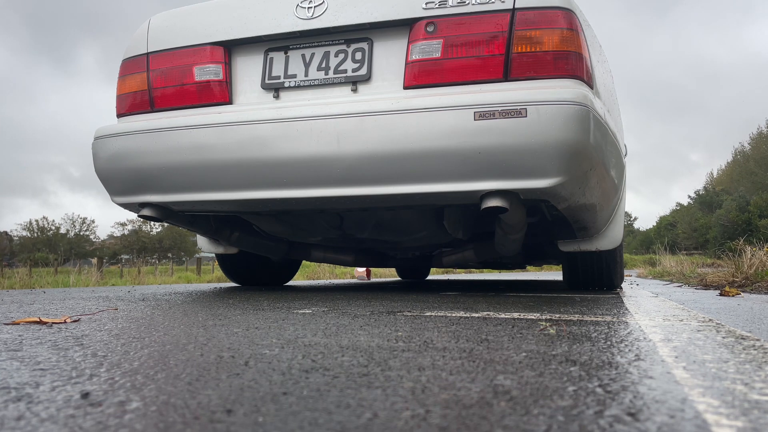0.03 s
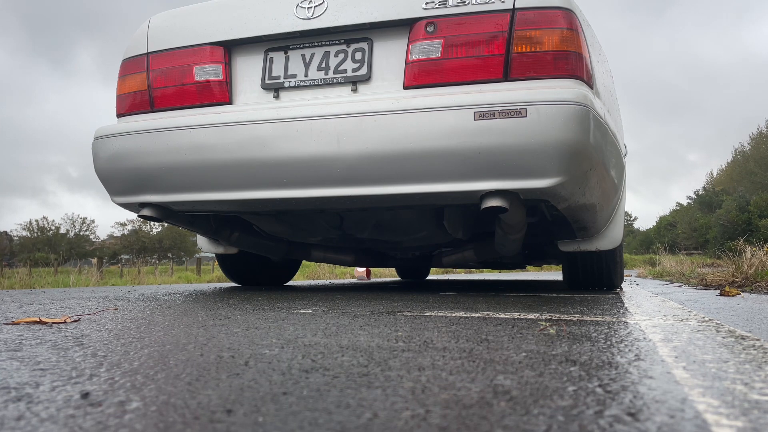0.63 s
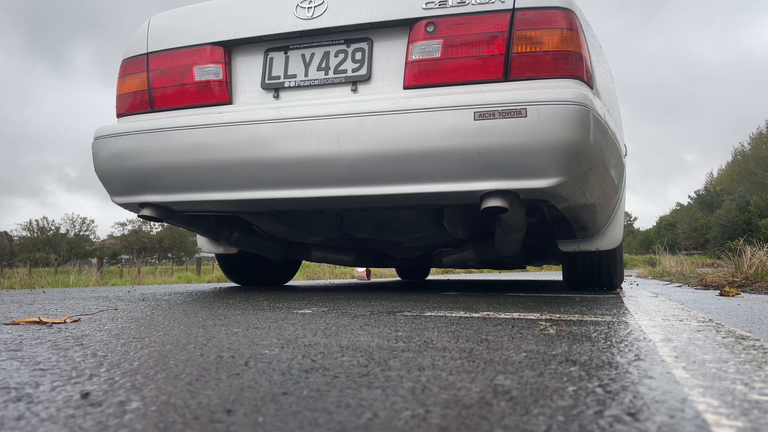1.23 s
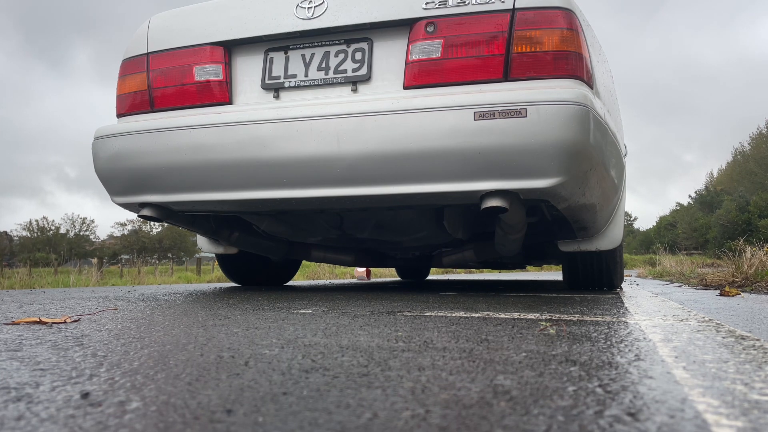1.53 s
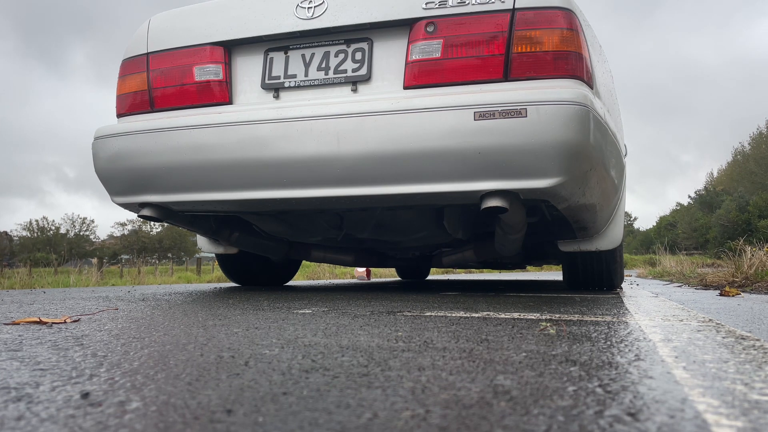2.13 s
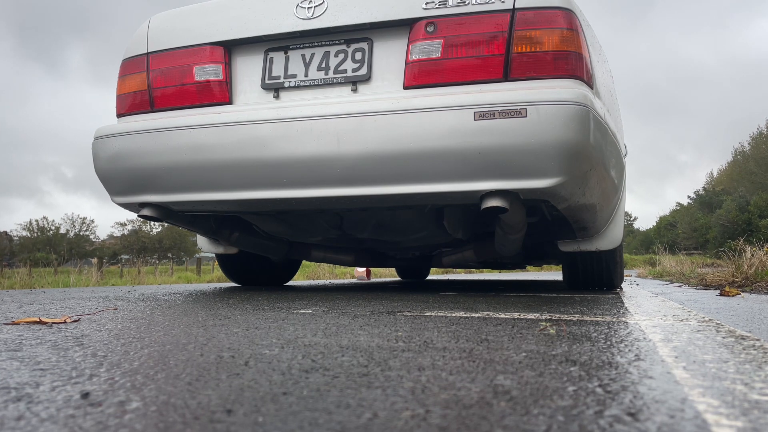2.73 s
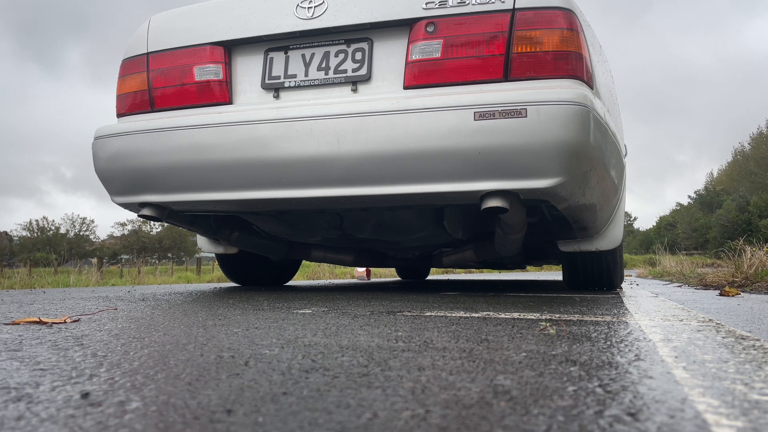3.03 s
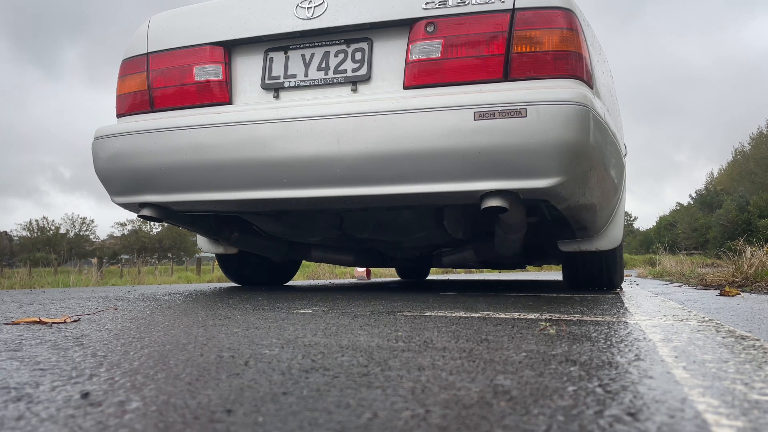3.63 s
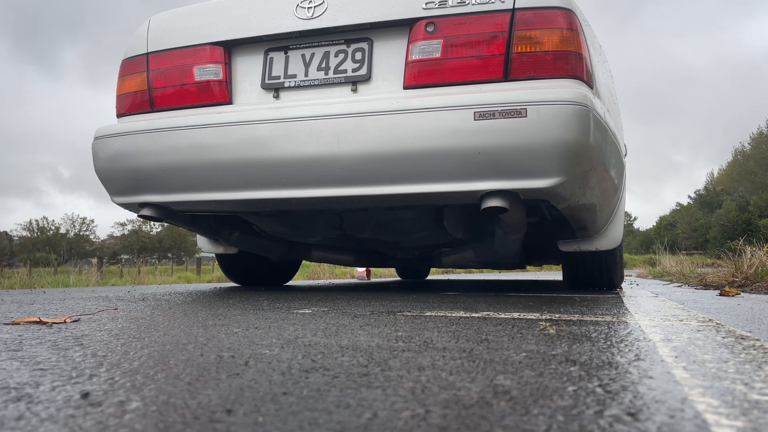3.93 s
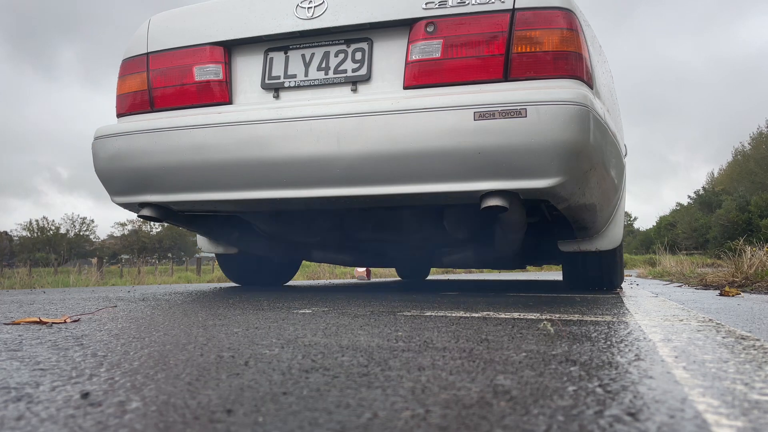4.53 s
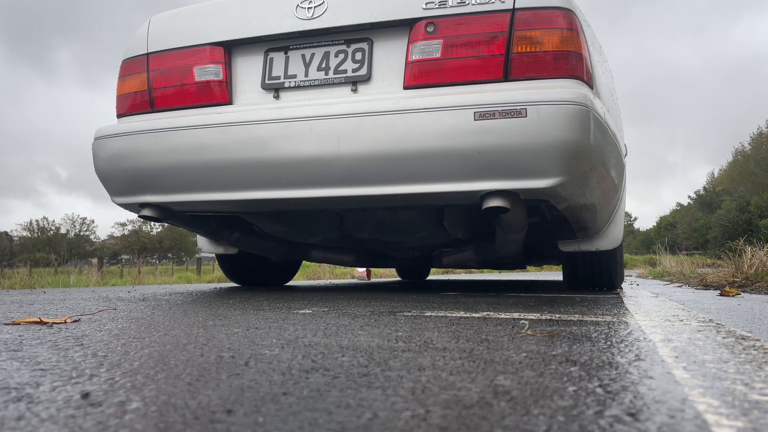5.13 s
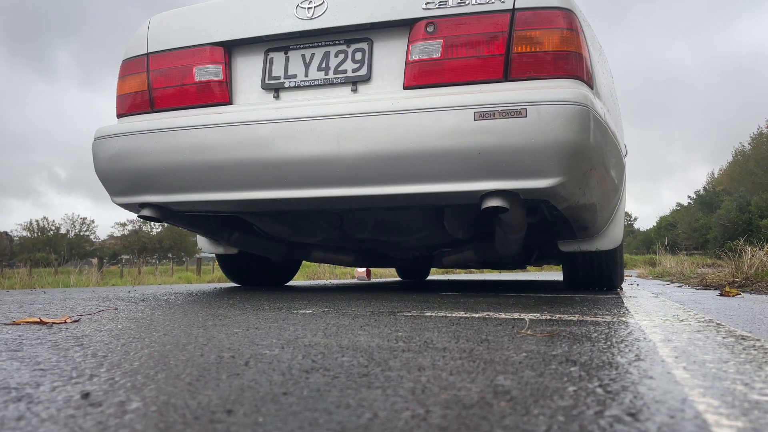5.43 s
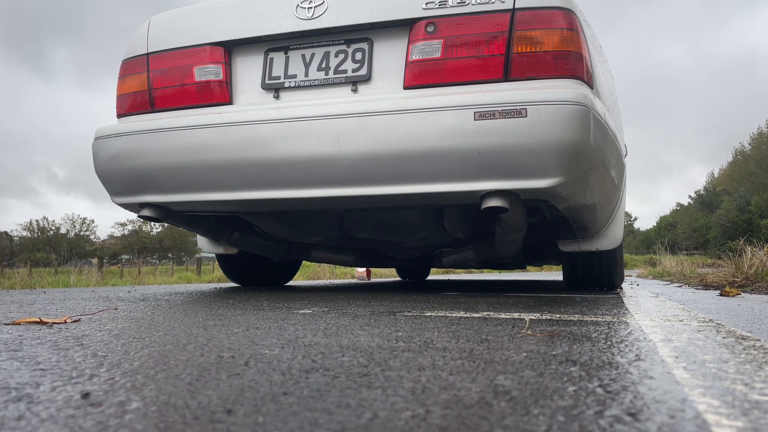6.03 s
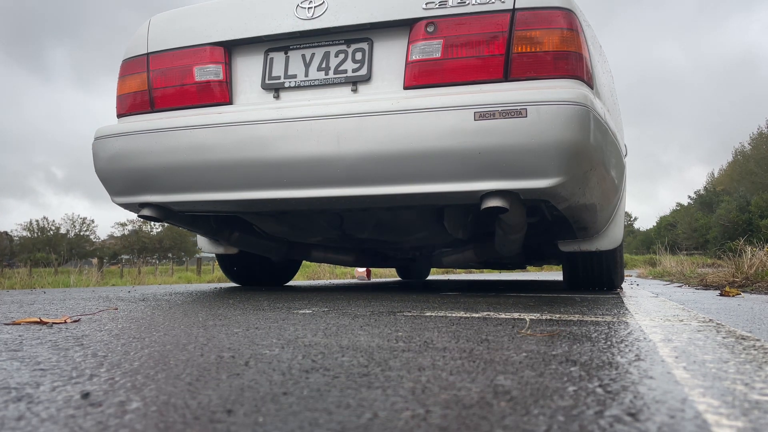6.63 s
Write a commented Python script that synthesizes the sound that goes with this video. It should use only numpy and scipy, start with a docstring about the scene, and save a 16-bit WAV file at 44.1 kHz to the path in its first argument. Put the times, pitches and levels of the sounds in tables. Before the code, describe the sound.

A parked car's V8 engine idles with a low, loping throb. It is revved hard with a few coughs and a rasping bark, dips briefly, then climbs higher to the limiter, where the exhaust fires a quick volley of pops and thuds. The pitch falls in a long burble before one last small blip. The microphone is close behind the tailpipes, outdoors on a country road.

```python
"""On a wet country road, just behind the tailpipes of a standing V8 saloon.
It idles with a lope, is revved twice up to the limiter, crackles, runs down and is blipped again.
Crank speed sets the firing rate and, with the throttle, the balance of the layers. Firing pulses
excite the pipe resonances, turbulence hisses, and under load the strongest pulses steepen into cracks.
Coughs, thuds and pops of unburnt fuel sound at listed times."""
import sys
import numpy as np
from scipy import signal
from scipy.fft import rfft, irfft
from scipy.io import wavfile
from scipy.ndimage import uniform_filter1d, minimum_filter1d

SR = 44100
rng = np.random.default_rng(int(sys.argv[2]) if len(sys.argv) > 2 else 0)


def wrap_up_sound(samples):
    """Save the sound to the file named by the first command line argument, as 16-bit audio."""
    columns = np.atleast_2d(samples).T
    # keep every value between -1 and 1, then stretch to whole-number steps
    tamed = np.clip(columns, -1, 1)
    steps = np.round(tamed * 32767).astype(np.int16)
    wavfile.write(sys.argv[1], SR, steps)


N = 299880
T = np.arange(N) / SR


def amp(db):
    """Amplitude ratio of a level in decibels."""
    return 10 ** (np.asarray(db) / 20)


def unit_rms(x):
    """Normalisation to unit mean power."""
    return x / np.sqrt(np.mean(x ** 2) + 1e-20)


def running_power(x, size):
    """Short-time mean square, averaged twice over size samples."""
    return uniform_filter1d(uniform_filter1d(x ** 2, size), size)


def steadied(x, size):
    """Slow gain control: the running rms stays near 1 while single pulses stand out."""
    return x / np.sqrt(abs(running_power(x, size) + 1e-6 * np.mean(x ** 2)))


def noise():
    """White Gaussian noise."""
    return rng.standard_normal(N)


def wander(hz):
    """Random modulation of unit rms, rolling off above hz."""
    f = np.fft.rfftfreq(N, 1 / SR)
    return unit_rms(irfft(rfft(noise()) * np.exp(-(f / hz) ** 2), N))


def colour(x, spectrum, size=4096):
    """Minimum-phase filter through points of frequency_hz, gain_db."""
    hz, db = np.transpose(spectrum)
    f = abs(np.fft.fftfreq(size, 1 / SR))
    log_gain = np.log(amp(np.interp(np.log(f + 1), np.log(hz + 1), db)))
    response = np.fft.ifft(np.exp(np.conj(signal.hilbert(log_gain)))).real[:size // 2]
    return signal.oaconvolve(x, response)[:N]


def cut(x, hz, kind, order=2):
    """Maximally flat low-pass or high-pass filter."""
    return signal.sosfilt(signal.butter(order, hz, kind, fs=SR, output="sos"), x)


def resonate(x, modes, shape=np.sin):
    """Modal response: each mode is a sinusoid whose bandwidth sets its decay rate."""
    t = T[:SR // 4]
    response = sum(amp(db) * 2 * np.pi * width / SR * np.exp(-np.pi * width * t)
                   * shape(2 * np.pi * hz * t) for hz, width, db in modes)
    return signal.oaconvolve(x, response)[:N]


def impulses(times_s, strengths):
    """Impulse train with the given times and strengths."""
    samples = np.clip(np.round(np.asarray(times_s) * SR).astype(int), 0, N)
    return np.bincount(samples, strengths, N + 1)[:N]


def log_interp(at_hz, hz, db):
    """Interpolation on a logarithmic frequency axis."""
    return np.interp(np.log(at_hz), np.log(hz), db)


def level(rows, engine):
    """Gain of a layer: speed picks its coasting and pulling levels, and the throttle blends them."""
    cycle_hz, opening = engine
    hz, coasting_db, pulling_db = np.transpose(rows)
    coasting, pulling = log_interp(cycle_hz, hz, coasting_db), log_interp(cycle_hz, hz, pulling_db)
    return amp(coasting + opening * (pulling - coasting))


# Throttle presses: start_s, end_s, opening_fraction
THROTTLE_PRESSES = [(2.511, 3.298, 0.95), (3.438, 3.846, 0.43), (3.914, 4.386, 0.95), (4.775, 4.943, 0.9),
                    (5.07, 5.146, 0.55), (6.642, 6.804, 0.46)]
def throttle(open_s=0.024, close_s=0.092):
    """First-order lag: the opening builds after each press and dies away on release."""
    since = lambda s: np.maximum(T - s, 0)
    return np.max([opening * (1 - np.exp(-since(start) / open_s)) * np.exp(-since(end) / close_s)
                   for start, end, opening in THROTTLE_PRESSES], axis=0)


# The eight unequal cylinders: phase_cycles, idle_db, fast_db, crack_db
CYLINDER_PULSES = [(.08, 6.7, 4.5, -1.5), (0.192, 3, 11.5, -7.5), (0.322, 6.5, 7.5, -61.5),
                   (0.455, 9, 15, -22.5), (.574, 2.5, -4, 7.5), (.702, 8, 9.5, 3.5), (0.839, 4, 13.5, 1),
                   (.956, 9.5, 12, -31.5)]
PHASE_CYCLES, IDLE_DB, FAST_DB, CRACK_DB = np.transpose(CYLINDER_PULSES)
def firings(cycles, cylinder_db, scatter_db, jitter_s):
    """Quasi-periodic excitation: one impulse a firing, scattered in strength and timing."""
    phases = np.arange(int(cycles[-1]) + 1)[:, None] + PHASE_CYCLES
    strength, delay = rng.standard_normal((2,) + phases.shape)
    times_s = np.interp(phases, cycles, T, right=2 * T[-1]) + jitter_s * delay
    return impulses(times_s.ravel(), amp(cylinder_db + scatter_db * np.clip(strength, -2, 2)).ravel())


# Resonances of pipes and silencers: pitch_hz, bandwidth_hz, gain_db
PIPE_MODES = [(59.45, 3.8, 7), (94.5, 3.9, -2), (119.4, 14, -12.5), (134.8, 7.2, 10.5), (149.3, 15, 4),
              (163, 4.9, 3), (233, 13.4, -4.5), (282, 7.4, -4), (339.3, 4.1, -4), (366.7, 1.8, -3),
              (420, 6.3, 0), (463.3, 8, -7.5), (517, 15, -22)]
# Chuff of the idle: frequency_hz, gain_db
CHUFF_SPECTRUM = [(150, -20), (300, 0.5), (450, 4), (540, -7.5), (620, -25.5), (800, -8.5), (950, -24),
                  (1300, -42.5), (3000, -60.5)]
# Low-speed throb: cycle_hz, coasting_db, pulling_db
THROB_LEVELS = [(7.08, -11, -5.5), (11.85, -23.5, -10), (15.9, -41, -14), (24, -57, -60)]
def throb(cycles, engine):
    """Forced resonance: unequal pulses ring the long pipes in a lope, with one chuff a cycle."""
    pulses = firings(cycles, IDLE_DB, scatter_db=.6, jitter_s=.00008)
    pipe = cut(resonate(pulses, PIPE_MODES), 61.4, "highpass", order=3)
    pipe = cut(pipe, 504, "lowpass", order=7)
    gust = np.maximum(np.cos(2 * np.pi * (cycles - .03)), 0) ** 2
    chuff = colour(gust * (unit_rms(pulses) + .5 * noise()), CHUFF_SPECTRUM)
    return level(THROB_LEVELS, engine) * (steadied(pipe, size=6100) + amp(-10.5) * unit_rms(chuff))


# Boom at the firing rate: cycle_hz, coasting_db, pulling_db
NOTE_LEVELS = [(8.4, -50.5, -27), (11.4, -32, -4.5), (17, -22.5, -4.5), (31.5, -44.5, -29), (54, -53, -75)]
def firing_note(cycles, engine):
    """Periodicity gives pitch: eight pulses a cycle merge into one tone."""
    note = np.sin(2 * np.pi * 8 * cycles) * amp(wander(25))
    return level(NOTE_LEVELS, engine) * unit_rms(note)


# Harmonics of the cycle rate: harmonic_number, level_db
BURBLE_HARMONICS = [(2, -7), (3, -7), (4, -17.5), (5, 1), (6, -4.5), (7, -14), (9, -19), (10, -9),
                    (11, -25.5), (12, -11), (13, -16.5)]
# Transmission of the silencer: frequency_hz, gain_db
SILENCER_RESPONSE = [(55, -18), (78, -20), (95, -1), (115, -2.5), (135, 0.5), (170, -3.5), (220, -5),
                     (290, -7), (430, 6), (700, -1)]
# Burble of the banks: cycle_hz, coasting_db, pulling_db
BURBLE_LEVELS = [(7, -59, -46), (15, -39, -50), (31.3, -26.5, -16.5), (53, -25, -26.5)]
def burble(cycles, engine):
    """Source and filter: harmonics of the unevenly firing banks slide through the silencer's peaks."""
    cycle_hz, _ = engine
    harmonics = np.zeros(N)
    for k, db in BURBLE_HARMONICS:
        silencer_db = log_interp(k * cycle_hz, *np.transpose(SILENCER_RESPONSE))
        gain = amp(db + silencer_db + 2.24 * wander(5.7))
        harmonics += gain * np.sin(2 * np.pi * (k * cycles + rng.random()))
    return level(BURBLE_LEVELS, engine) * np.sqrt(2) * harmonics


# Combustion noise: frequency_hz, gain_db
RUMBLE_SPECTRUM = [(20, -34.5), (50, -20.5), (90, -3), (140, -4.5), (220, -9.5), (450, -9), (700, -19),
                   (1500, -61.5)]
# Its strength: cycle_hz, coasting_db, pulling_db
RUMBLE_LEVELS = [(6.87, -25, -21.5), (11.3, -36, -8.5), (26.8, -30, -29), (40.7, -44.5, -29.5),
                 (54.2, -18.5, -42)]
def rumble(engine):
    """Random variation in combustion spreads energy into a low band of noise."""
    lumps = cut(colour(noise(), RUMBLE_SPECTRUM), 77, "highpass", order=3)
    return level(RUMBLE_LEVELS, engine) * unit_rms(lumps)


# Gas rush and engine-bay hiss: frequency_hz, gain_db
RUSH_SPECTRUM = [(650, 4.5), (1100, 0), (1230, 1), (1370, -4.5), (1770, -3), (2020, -6), (2470, -5),
                 (2670, -4.5), (3250, -4.5), (4150, -9.5), (5980, -12.5), (15500, -35.5)]
# Its strength: cycle_hz, coasting_db, pulling_db
RUSH_LEVELS = [(7.2, -39.5, -40), (11, -39, -26.5), (15.1, -62.5, -34.5), (32, -52, -37), (54, -43, -36)]
def rush(cycles, engine):
    """Amplitude modulation: flow noise flutters at the firing rate."""
    flutter = amp(1.1 * np.cos(2 * np.pi * 8 * cycles) + 0.87 * wander(40))
    return level(RUSH_LEVELS, engine) * unit_rms(flutter * colour(noise(), RUSH_SPECTRUM))


# Gusts of exhaust: cycle_hz, coasting_db, pulling_db
BUFFET_LEVELS = [(7, -55, -42), (15, -73.5, -32), (26, -73, -42), (42, -72, -67), (54, -50, -53)]
def buffet(engine):
    """Turbulent pressure fluctuation: gas blowing past the listener makes a deep flutter."""
    gusts = cut(cut(noise(), 81, "lowpass", order=3), 21, "highpass")
    return level(BUFFET_LEVELS, engine) * unit_rms(gusts)


# Hard pulses at the pipe mouth: frequency_hz, gain_db
BARK_SPECTRUM = [(120, -31.5), (240, -5), (320, -13), (420, -6), (520, -3.5), (620, -9), (740, 4),
                 (860, -1), (1020, -11.5), (1250, -15.5), (1700, -27.5), (2500, -34.5), (4000, -55),
                 (9000, -66)]
# Their strength: cycle_hz, coasting_db, pulling_db
BARK_LEVELS = [(7.3, -69.5, -32.5), (10.35, -73, -12), (18, -44.5, -4.5), (34.9, -29, -11),
               (52, -20.5, -15)]
def bark(cycles, engine):
    """Radiation from an open end: each firing leaves as a hard pulse and a turbulent puff."""
    burr = unit_rms(firings(cycles, FAST_DB, scatter_db=2.8, jitter_s=.00009))
    rap = unit_rms(firings(cycles, .6 * CRACK_DB, scatter_db=1.0, jitter_s=.00003))
    # under load a few cylinders dominate, and the even burr turns into a rap
    load = np.clip(level(CRACK_LEVELS, engine) / amp(-34), 0, 1)
    pulses = (1 - load) * burr + load * rap
    puffs = cut(pulses, 170, "lowpass", order=1) * noise()
    voice = colour(unit_rms(pulses) + amp(-5) * unit_rms(puffs), BARK_SPECTRUM)
    return level(BARK_LEVELS, engine) * steadied(voice, size=3000)


# Paths between road, bumper and floor pan: delay_s, gain_db
NEAR_REFLECTIONS = [(.0037, -19), (.0059, -34), (.0083, -24), (0.0116, -14.5)]
def roadside(x, far_db, far_t60_s):
    """Reflection: early echoes from under the car, then faint, dull scattering from the trees."""
    t = T[:SR]
    near = sum(amp(db) * np.interp(T - delay_s, T, x) for delay_s, db in NEAR_REFLECTIONS)
    tail = cut(rng.standard_normal(SR) * (t > .015), 1700, "lowpass") * amp(-60 * t / far_t60_s)
    far = signal.oaconvolve(x, amp(far_db) * tail / np.linalg.norm(tail))[:N]
    return cut(x + near + far, 120, "highpass")


# Ragged firings: start_s, relative_level_db
COUGH_EVENTS = [(2.692, -1), (2.713, 2.5), (2.936, 8), (2.964, 1.5), (2.988, 16.5), (3.829, -11),
                (3.928, 1), (5.955, -10.5), (6.419, -11), (6.428, -6.5), (6.708, -1), (6.715, -7),
                (6.735, -6), (6.764, 0)]
# Their dull tone: frequency_hz, gain_db
COUGH_SPECTRUM = [(60, -92), (200, 2), (500, -1.5), (800, 6), (1100, -10), (2000, -23.5), (3500, -63),
                  (8000, -59), (16000, -72.5)]
def coughs():
    """Impulsive excitation: each ragged firing gives a dull knock and a decaying puff."""
    start_s, db = np.transpose(COUGH_EVENTS)
    pulses = impulses(start_s, amp(db))
    puffs = cut(pulses, 30, "lowpass", order=1) * noise()
    return amp(-27) * unit_rms(cut(colour(pulses + 8 * puffs, COUGH_SPECTRUM), 2000, "lowpass"))


# Shock front: frequency_hz, gain_db
SHOCK_SPECTRUM = [(150, -30), (400, -12), (650, -4), (860, 0), (1150, -8), (1450, -9), (1750, -16),
                  (2100, -15), (2800, -21), (3400, -22), (4500, -33), (7000, -39), (15500, -48)]
# Resonances of the tailpipe tip: pitch_hz, bandwidth_hz, gain_db
TIP_MODES = [(855, 150, -3), (1980, 80, -4), (3360, 150, 2)]
def blast(shocks):
    """Shock excitation: each front reflects off the road, trails turbulence and rings the tip."""
    turbulence = cut(abs(shocks), 73, "lowpass", order=1) * noise()
    road_echo = 0.33 * np.interp(T - .0022, T, shocks)
    front = colour(shocks + road_echo + 2.5 * turbulence, SHOCK_SPECTRUM)
    return front + resonate(front, TIP_MODES, np.cos)


# Cracks under load: cycle_hz, coasting_db, pulling_db
CRACK_LEVELS = [(7, -88.5, -49), (18.1, -85, -32), (25.4, -95.5, -22.5), (40, -82, -17.5),
                (58.3, -58, -24.5)]
def cracks(cycles, engine):
    """Nonlinear steepening: the strongest pulses become shocks as the throttle nears wide open."""
    cycle_hz, opening = engine
    shocks = blast(firings(cycles, CRACK_DB, scatter_db=2.0, jitter_s=.00003))
    treble = cut(shocks, 1830, "highpass", order=4)
    treble_rms = np.sqrt(abs(running_power(treble, size=3500)) + 1e-12)
    return level(CRACK_LEVELS, (cycle_hz, opening ** 1.81)) * shocks / treble_rms


# Hiss torn off the pressure peaks: frequency_hz, gain_db
FIZZ_SPECTRUM = [(1000, -25), (2200, -3), (4500, -2), (8000, -4), (11500, 0), (15500, -1)]
def fizz(pressure, threshold=.45):
    """Threshold nonlinearity: only the highest pressure peaks tear into bright hiss."""
    excess = np.tanh(np.maximum(abs(pressure) - threshold, 0) / .5)
    return amp(-15.5) * colour(excess * noise(), FIZZ_SPECTRUM)


def swell(u):
    """Critically damped pulse, peaking at 1 when u is 1."""
    return u * np.exp(1 - u)


# Brief swings of exhaust level, mostly dips: start_s, onset_time_s, change_db
EXHAUST_LULLS = [(3.405, 0.011, -4), (3.7, 0.011, -4.5), (3.865, 0.011, 1), (6.447, 0.028, -15)]
def lulls():
    """Transient gain modulation: the level shifts abruptly and recovers more slowly."""
    return amp(sum(db * swell(np.maximum(T - start_s, 0) / onset_s)
                   for start_s, onset_s, db in EXHAUST_LULLS))


# Soft burns deep in the silencers: start_s, relative_level_db
THUD_EVENTS = [(3.775, -14), (3.809, -10), (4.413, -16), (4.462, -9.5), (4.513, -12.5), (4.635, -12.5),
               (4.765, -19), (4.975, -32), (5.023, -13.5), (5.108, -21)]
# Their boom: frequency_hz, gain_db
THUD_SPECTRUM = [(30, -40), (60, -25), (92, 26), (112, -5), (140, 17.5), (190, -5), (400, -41)]
def thuds(rise_s=0.012):
    """Low pipe resonance: each slow burn of fuel is a swell of gas that booms."""
    start_s, db = np.transpose(THUD_EVENTS)
    envelope = signal.oaconvolve(impulses(start_s, amp(db)), swell(T[:SR // 4] / rise_s))[:N]
    boom = steadied(colour(noise(), THUD_SPECTRUM), size=900)
    return amp(-5.5) * cut(envelope * boom, 450, "lowpass", order=3)


# Bangs in the pipe: start_s, relative_level_db
POP_EVENTS = [(4.411, 10), (4.466, 15), (4.484, 11.5), (4.494, 13), (4.504, -15), (4.513, -3),
              (4.523, 10.5), (4.602, 10), (4.623, 10), (4.635, 20.5), (4.645, 5), (4.656, 5.5), (4.663, 4),
              (4.673, 10.5), (4.692, 7), (4.7, -7), (4.733, 7), (4.77, -4), (4.809, 5), (5.108, 9)]
def pops():
    """Sudden combustion: unburnt fuel goes off at the rev limiter, each bang echoing in the pipe."""
    start_s, db = np.transpose(POP_EVENTS)
    bangs = impulses(start_s, amp(db))
    echoes = impulses(start_s + .0023, amp(db - 12))
    return amp(-27) * unit_rms(blast(bangs + echoes))


# Engine speed, a cycle being two crank turns or eight firings: time_s, cycle_hz
CRANK_SPEED = [(0.0, 7.695), (1.04, 7.233), (2.49, 6.997), (2.6, 7.683), (2.73, 9.691), (2.85, 12.924),
               (2.96, 18.394), (3.24, 34.111), (3.36, 39.283), (3.9, 27.706), (3.96, 29.237),
               (4.06, 33.669), (4.34, 52.368), (4.41, 53.978), (4.6, 52.918), (4.69, 53.481),
               (5.04, 44.889), (5.2, 40.252), (5.52, 32.593), (5.86, 25.267), (6.2, 18.552), (6.4, 15.516),
               (6.54, 14.578), (6.66, 16.064), (6.8, 22.278)]
def scene():
    """Superposition: layers that follow crank and throttle add to the timed coughs, thuds and pops."""
    cycle_hz = np.interp(T, *np.transpose(CRANK_SPEED))
    cycles = np.cumsum(cycle_hz) / SR
    engine = (cycle_hz, throttle())
    lull = lulls()
    drone = firing_note(cycles, engine) + burble(cycles, engine) + rumble(engine)
    soft = throb(cycles, engine) + lull * drone + rush(cycles, engine) + buffet(engine) + thuds()
    shocks = cracks(cycles, engine) + pops()
    sharp = lull * bark(cycles, engine) + coughs() + shocks + fizz(shocks)
    return (soft + roadside(sharp, far_db=-20, far_t60_s=0.25))[None]


def record(dry):
    """Peak limiting and soft saturation, then a band limit at 15.9 kHz."""
    safe_gain = np.minimum(1, 1 / (abs(dry[0]) + 1e-9))
    held = dry * uniform_filter1d(minimum_filter1d(safe_gain, size=120), size=120)
    rounded = held / (1 + (held / 1.02) ** 8) ** (1 / 8)
    lowpass = signal.firwin(511, 15900, window=("kaiser", 9), fs=SR)
    return signal.oaconvolve(rounded, lowpass[None], "same")


dry = scene()
out = record(dry)
wrap_up_sound(out)
```